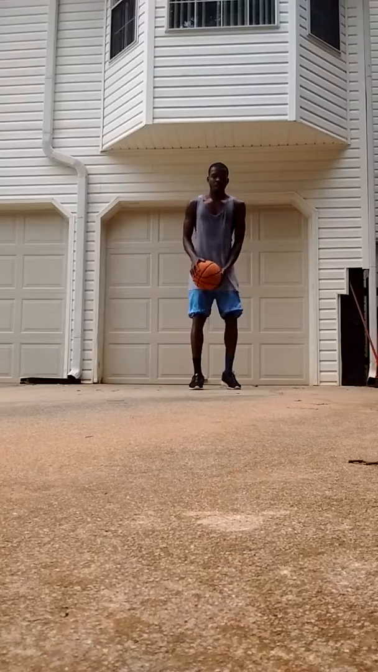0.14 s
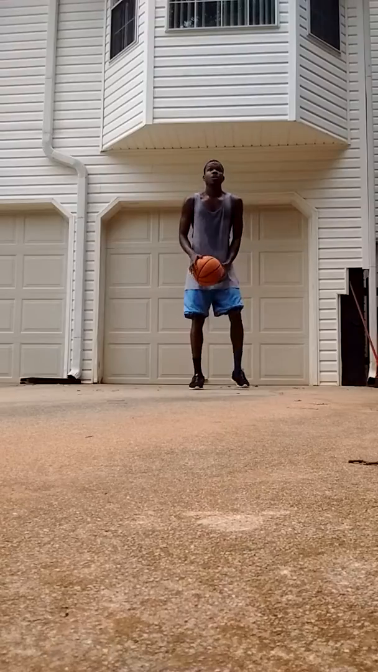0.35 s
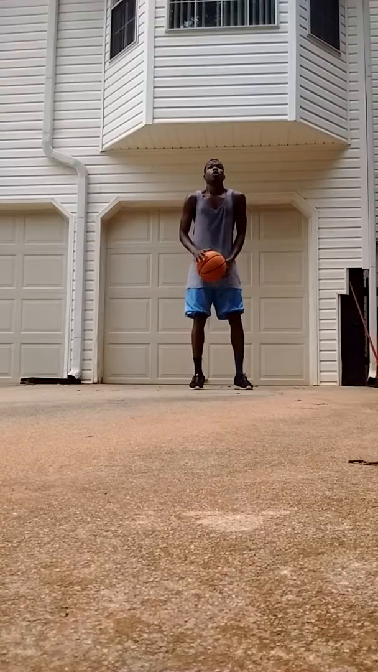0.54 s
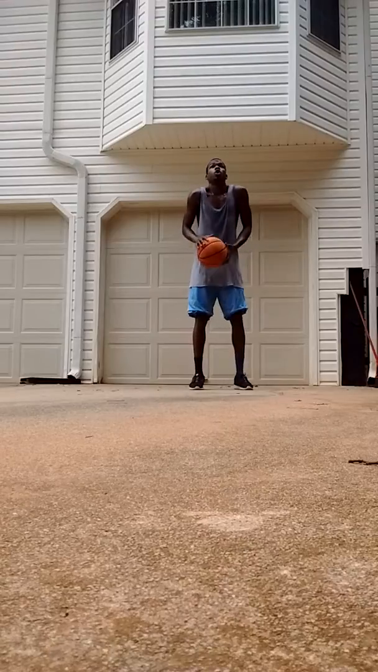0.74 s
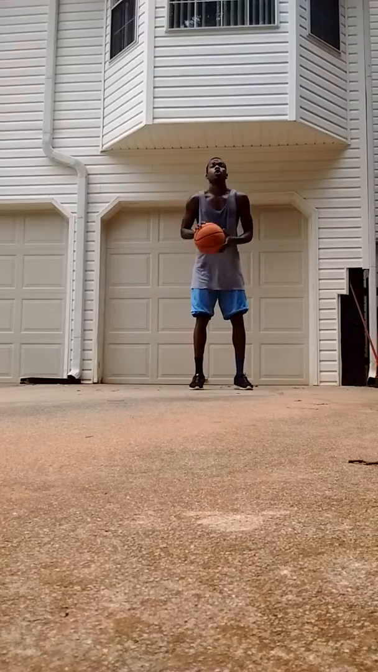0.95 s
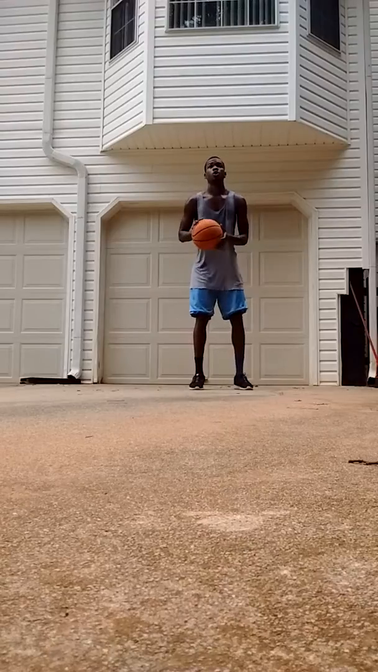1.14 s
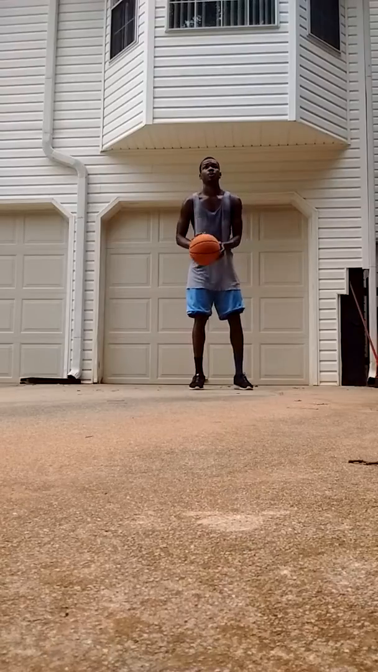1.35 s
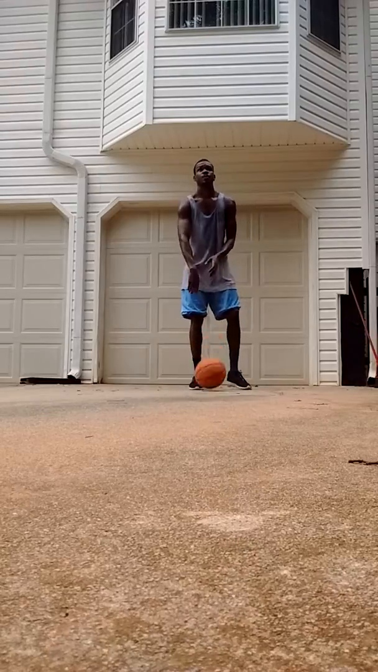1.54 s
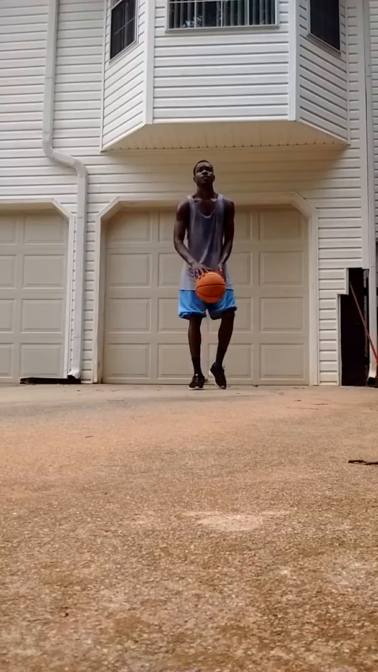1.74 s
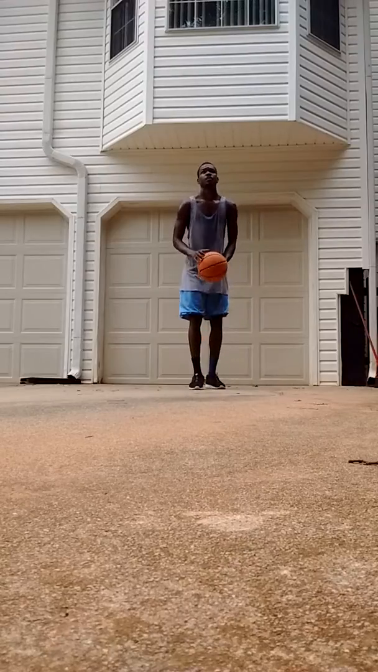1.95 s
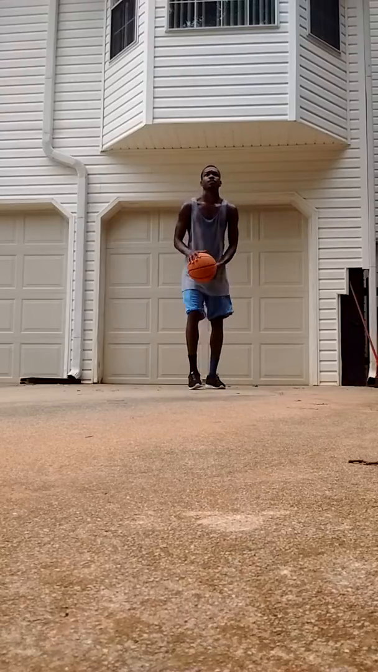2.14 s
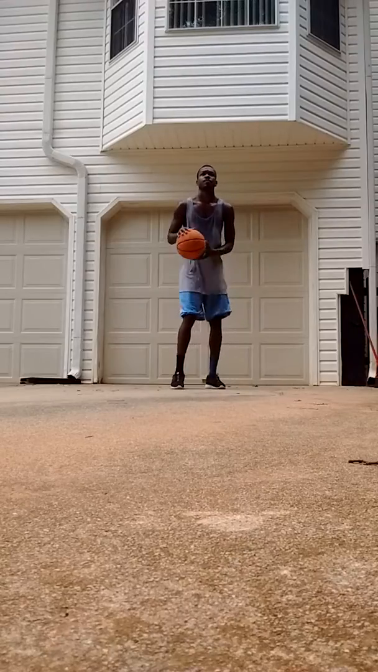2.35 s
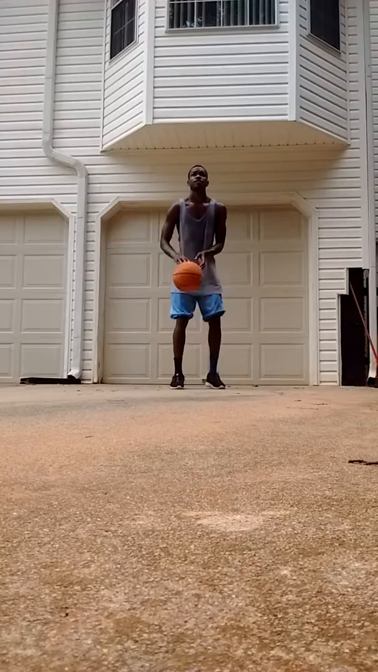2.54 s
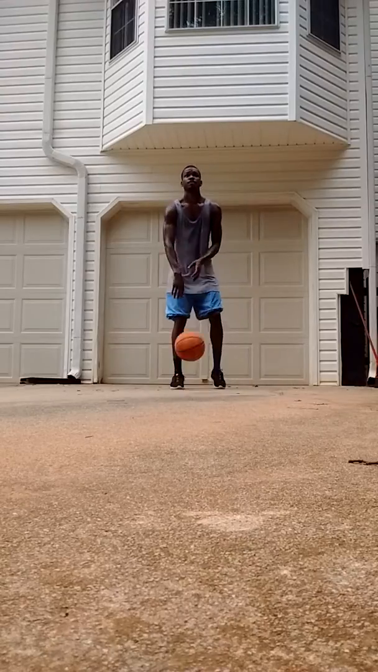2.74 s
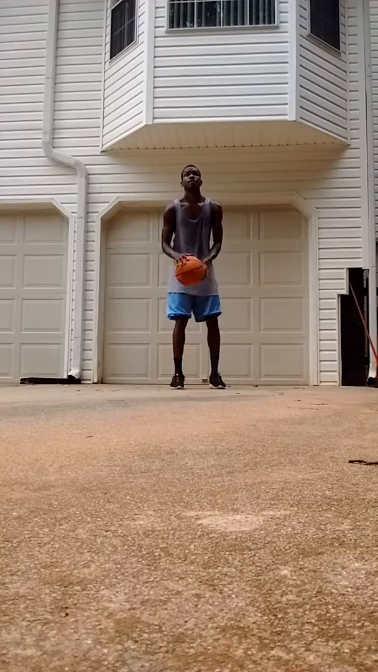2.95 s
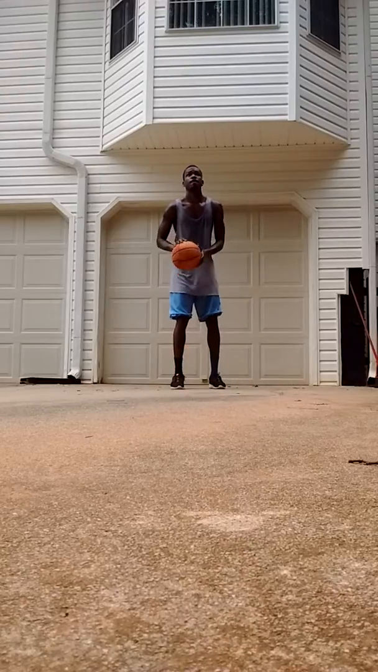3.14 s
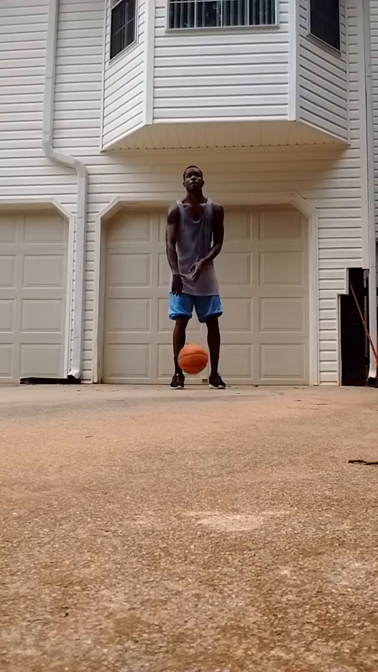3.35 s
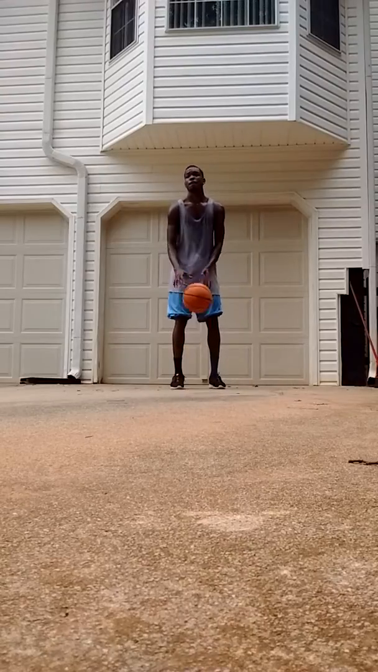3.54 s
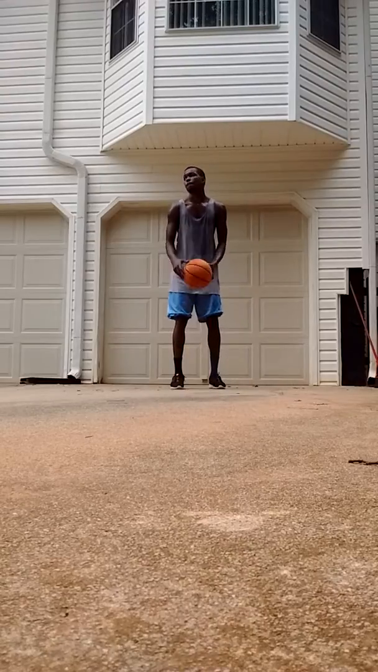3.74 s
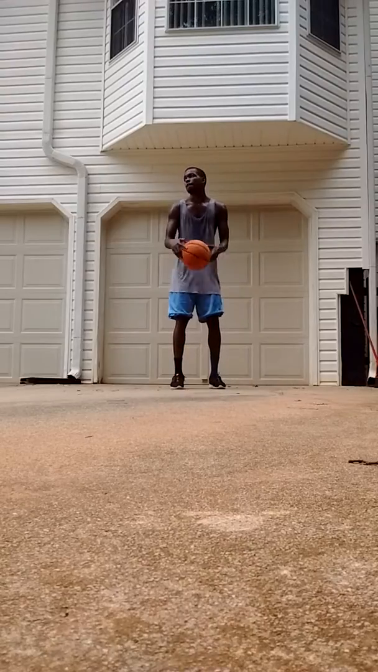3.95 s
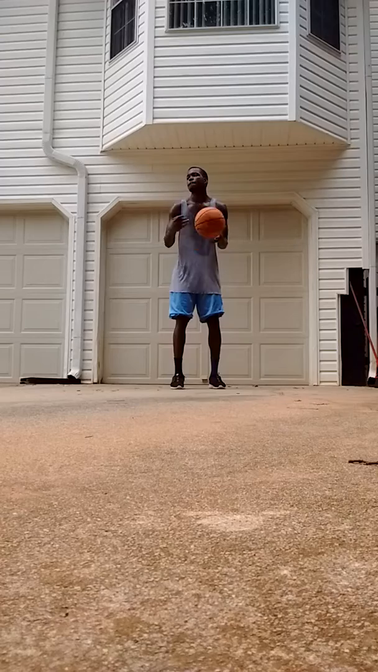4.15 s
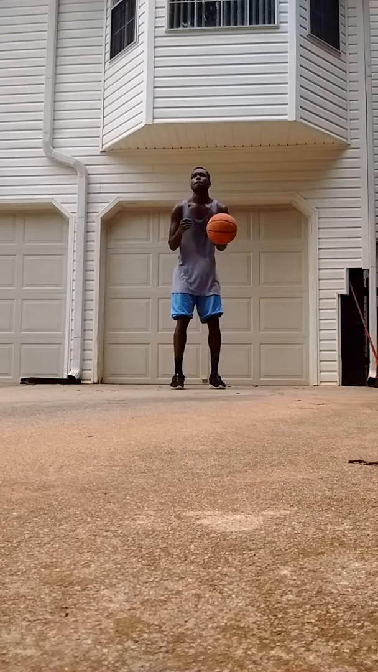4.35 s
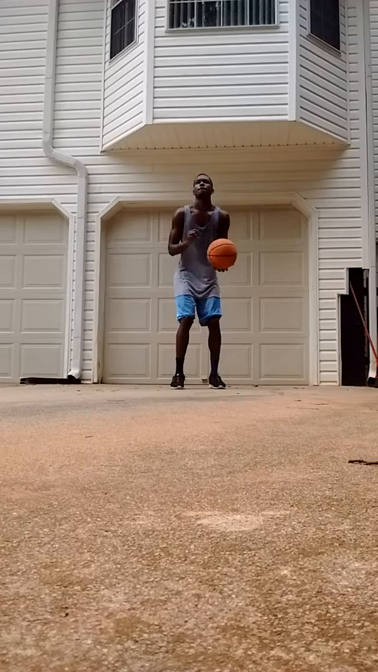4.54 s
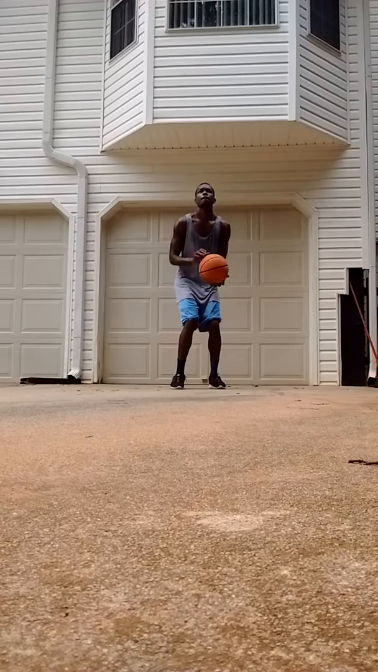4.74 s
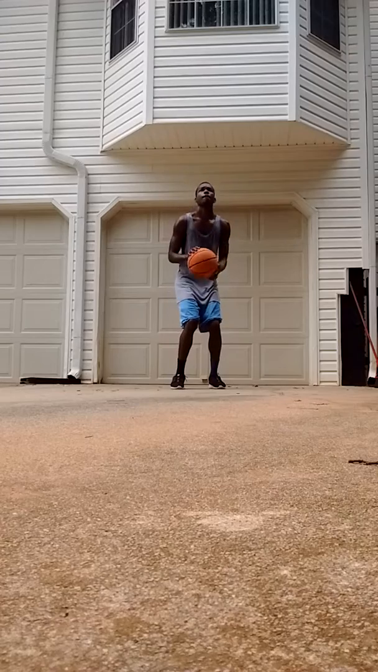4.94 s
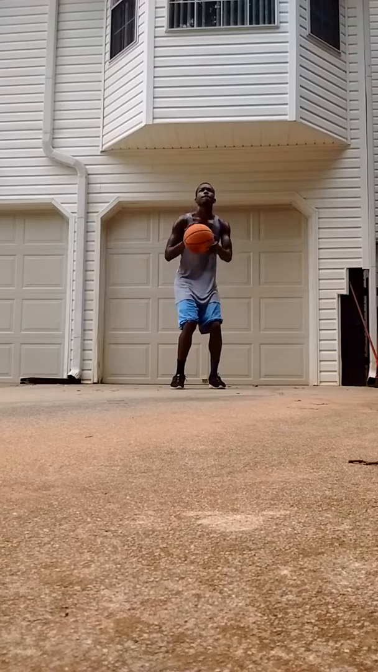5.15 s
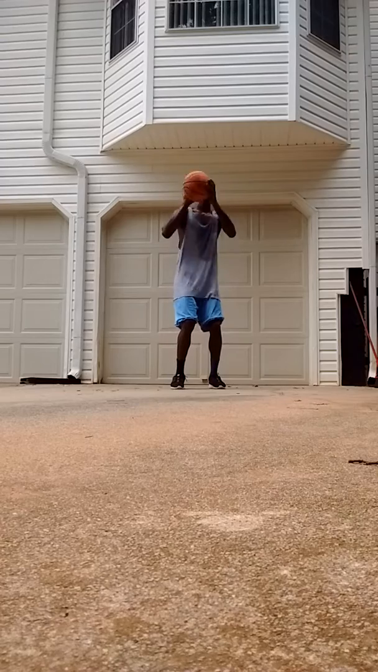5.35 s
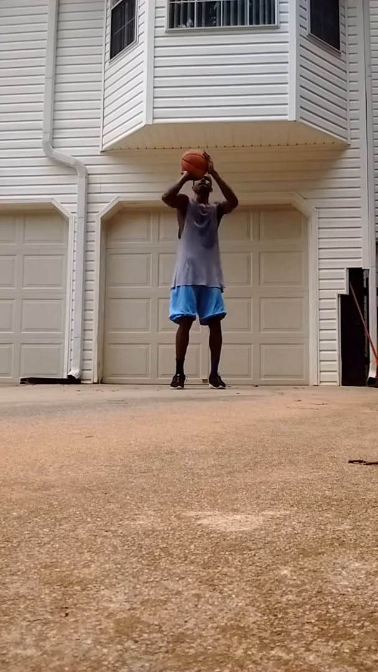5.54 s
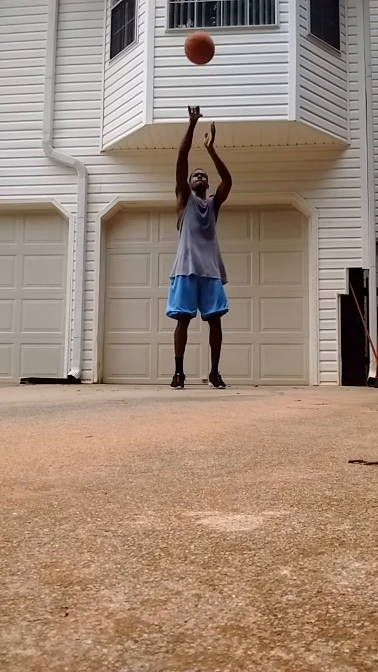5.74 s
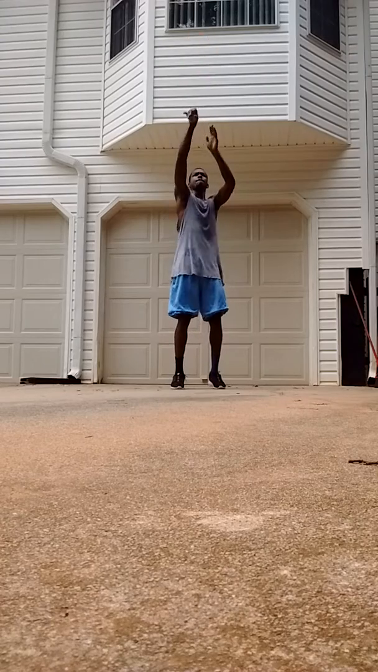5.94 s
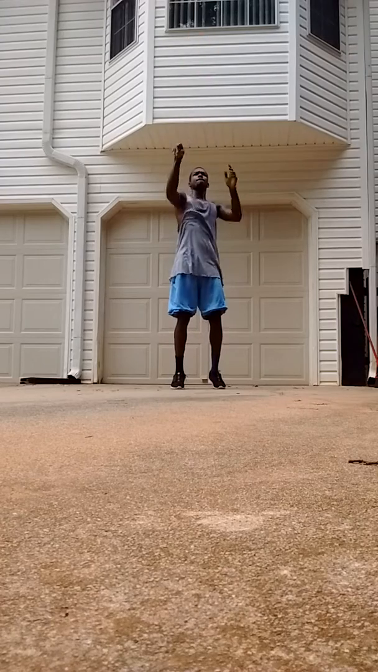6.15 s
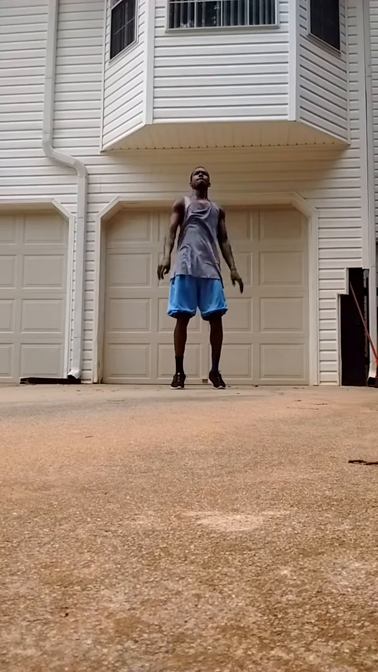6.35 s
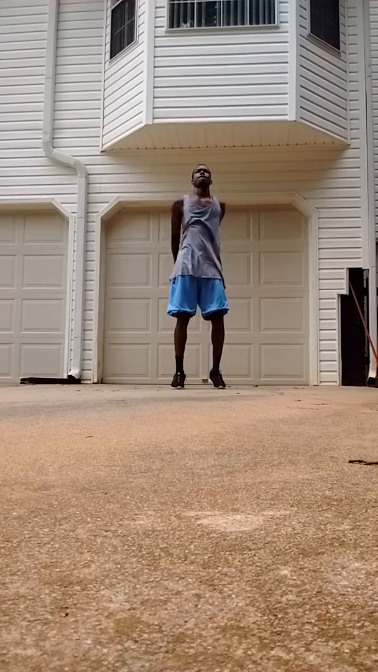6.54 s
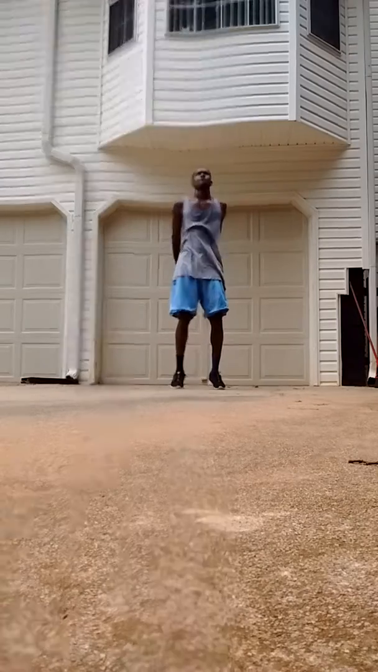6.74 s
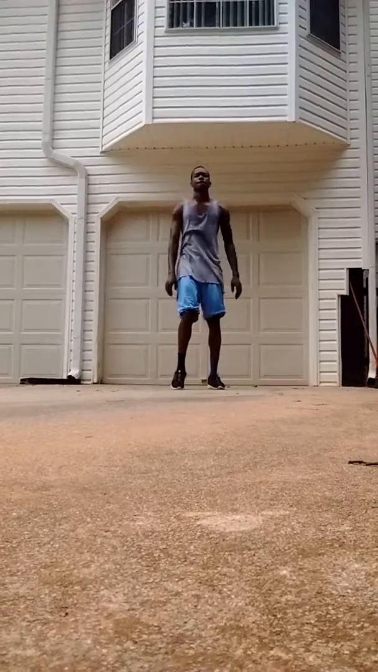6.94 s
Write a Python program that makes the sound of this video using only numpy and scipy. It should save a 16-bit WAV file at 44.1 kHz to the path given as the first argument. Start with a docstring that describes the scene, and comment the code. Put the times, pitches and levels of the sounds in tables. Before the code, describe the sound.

A phone near the hoop picks up windy leaves, far traffic, a passing engine's drone and a faint hum and whine. Three sharp, loud basketball smacks on concrete follow, slightly softer and duller each time, slapping back off the house. The phone ducks its level at each blow, then the yard noise creeps up. At the very end comes a brief, close clatter of rim and backboard with a bright metallic tick.

```python
"""Basketball by the garage

A ball bounces three times on a concrete driveway, then strikes the hoop beside a phone. Bounces are air pushes,
rubber noise and damped sines with wall echoes; the hoop is rattling clusters of damped sines and noise.
Shaped noise makes far traffic, leaves, a passing engine and a rumble; wavering sines make a hum and a whine.
The phone widens its two ports, and its gain ducks at each blow and creeps back, so the yard swells in the pauses."""
import sys
import numpy as np
from scipy import signal
from scipy.fft import rfft, irfft, next_fast_len
from scipy.io import wavfile
from scipy.ndimage import minimum_filter1d, map_coordinates

SR = 44100
rng = np.random.default_rng(int(sys.argv[2]) if len(sys.argv) > 2 else 0)


def store_wav(level_fs):
    """Save 16-bit WAV to argv[1]."""
    pcm = np.round(np.clip(np.atleast_2d(level_fs), -1, 1) * 32767)
    wavfile.write(sys.argv[1], SR, pcm.T.astype(np.int16))


N = 308259

# Stereo layers have two rows: the sum of the ports, then their difference. Levels are those ahead of the phone.
# Yard noise density in the sum, before its swells: [f/Hz, level/dB per Hz]
YARD_SUM = [(30, -92), (120, -59), (400, -75), (700, -75), (1500, -78), (2500, -78.5), (4600, -83),
            (6300, -91), (8000, -79), (10000, -88.5), (13000, -92.5), (13500, -115), (14800, -101),
            (15600, -120)]
# Yard noise density in the difference, before its swells: [f/Hz, level/dB per Hz]
YARD_DIFFERENCE = [(25, -68), (70, -80), (130, -48), (250, -55), (550, -61.5), (1000, -68), (1700, -75.5),
                   (3000, -82), (6500, -88.5), (9000, -82), (11500, -95), (12200, -105), (13500, -119.5),
                   (15500, -120)]
# Colour of the rustling leaves: [f/Hz, relative level/dB]
RUSTLE_COLOUR = [(2000, -6), (3500, 12), (4500, 5), (5600, 8), (8000, 0.5), (14000, -52)]
# Colour of the deep rumble: [f/Hz, relative level/dB]
RUMBLE_COLOUR = [(20, -4), (35, -6), (60, 6), (100, -14), (200, -36)]
# Colour of the far engine: [f/Hz, relative level/dB]
ENGINE_COLOUR = [(30, -7.5), (60, -4.5), (85, 9), (120, -9), (200, -39.5)]
# Spells of the whine: [start t/s, length t/s, level/dB]
WHINE_SPELLS = [(-.1, 0.61, -34.5), (0.875, 0.85, -30), (2.326, 0.38, -32)]
# Bounces: [t/s, blow level/dB, slap level/dB re blow, slap treble limit f/Hz, door level/dB re blow]
BOUNCES = [(1.6243, 18, -10.5, 10100, -35.5), (2.7554, 17, -11.5, 9000, -36),
           (3.4364, 15.5, -12.5, 7000, -35)]
# Modes of ball skin and air, re blow: [f/Hz, sum level/dB, difference level/dB, t60/s]
BALL_MODES = [(870, -58, -20.5, 0.018), (1034, -39, -34, 0.055), (1166, -35.5, -38, 0.053),
              (1480, -46, -25, 0.0096), (1864, -21, -43, 0.013), (2930, -58, -22, 0.008),
              (3980, -31.5, -41, 0.013)]
# Low thud as the flattened ball springs back, re blow: [f/Hz, sum level/dB, difference level/dB, t60/s]
THUD_MODES = [(93, -47, -8.5, 0.071), (141, -57, -16, 0.052), (208, -27.5, -21, 0.055)]
# Hollow ring of the garage door: [f/Hz, relative level/dB, t60/s]
DOOR_MODES = [(960, -7, 0.04), (1071, -0.5, 0.042), (1215, 0, 0.04), (1330, -3, 0.04), (1520, -6, 0.043),
              (1800, -9, .04), (1950, -9, 0.03)]
# Echoes off the house: [delay t/s, level/dB re direct sound, bass limit f/Hz, treble limit f/Hz]
WALL_ECHOES = [(0.0117, -9, 890, 4560), (0.0203, -11, 60, 800), (.029, -33, 60, 700)]
# Contacts of ball and hoop: [t/s, board level/dB, rim level/dB, rim brightness/dB per octave]
HOOP_CONTACTS = [(6.7868, -24, -6.5, 2), (6.788, -20, -3, 9), (6.7941, -0.5, -0.5, 8), (6.7985, 0, -4, 2),
                 (6.8012, -4, 2, -3), (6.809, -7, -2, 5), (6.814, -13, -8, 0), (6.818, -15, -6.5, -2),
                 (6.838, 0, -12, 0), (6.843, -14, -8, 3), (6.849, -5, -5, 1), (6.8538, 1.5, 5.5, -7),
                 (6.860, 1, -2, -4), (6.866, -0.5, 3.5, 6), (6.872, 1, -3, 4), (6.878, -4, -4, -3),
                 (6.883, -1, -10, -2), (6.889, -14, -9, 0), (6.897, -9, -16, -3), (6.919, -8, -16, -10)]
# Modes of the board: [f/Hz, relative level/dB, t60/s]
BOARD_MODES = [(128, 0, 0.058), (200, -6, 0.063), (330, -10, 0.054), (436, -7, 0.065), (602, -6, 0.06),
               (800, -5, 0.02)]
# Modes of the rim: [f/Hz, relative level/dB, t60/s]
RIM_MODES = [(800, -4, 0.01), (953, -2, 0.023), (1093, -4.5, 0.023), (1200, -3, 0.021), (1336, -10, 0.025),
             (1420, -8, 0.043), (1647, -11.5, 0.044), (1900, -18, 0.0097), (2240, -24, 0.01),
             (2700, -23, 0.0084), (3100, -33, 0.0066)]
# Ticks of a loose metal part: [t/s, level/dB]
TICKS = [(6.7868, -13), (6.7936, -13), (6.8228, 12), (6.854, -16), (6.862, -10), (6.867, -22)]
# Ring of that metal part: [f/Hz, relative level/dB, t60/s]
TICK_MODES = [(4700, -7.5, 0.0057), (8620, -2, 0.0045), (11960, -12.5, 0.0061)]
# Reverberation of house and driveway: [f/Hz, t60/s]
REVERB_T60 = [(100, 0.22), (1200, 0.29), (2500, 0.29), (4500, 0.36), (12000, 0.055)]
# Balance of the two ports: [f/Hz, second over first level/dB]
PORT_BALANCE = [(800, -0.5), (2000, 1), (3200, -11.5), (5000, -1), (6300, -2.5), (8000, 8), (12000, 5)]
# Balance of the widened stereo: [f/Hz, left over right level/dB]
STEREO_BALANCE = [(60, 1.5), (700, 0.67), (1300, 0), (2400, 2.5), (4400, 1), (8000, -1.5), (11000, 1.5),
                  (15000, 7)]

RUMBLE_DB, RUMBLE_GROWS_DB_S = -61, 3.0
PASS_S, PASS_DB, PASS_SPREAD_S = 1.45, -29.5, 1.18  # engine: nearest moment, level, distance over speed
TRAFFIC_DB, SWELL_S, SWELL_WIDTH_S, SWELL_DB = -1.28, 5.18, 0.31, 3  # traffic swells once
GUST_S, GUST_DB, GUST_RISE_DB_S, GUST_FALL_DB_S = 0.65, 5.5, 4, 1.3  # leaves peak, then calm steadily
RUSTLE_S, RUSTLE_DB, RUSTLE_ATTACK_S, RUSTLE_T60_S = 0.71, -39.5, 0.015, 1.4  # one sudden rustle
RUSTLE_BED_DB = -47  # faint bed under it, at the height of the gust
HUM_HZ, HUM_DB, HUM_GROWS_DB_S = 119.5, -39.5, 1.89
WHINE_HZ, WHINE_EDGE_S = 366.5, 0.085
RIM_MID_HZ = 1250  # pivot of the rim brightness
CRACK_DB = -14  # noise of a tick, beside its ring
SPRING_S, PUSH_S = 0.0016, 0.00099  # contact to spring-back, length of the push
SNAP = 1.4  # edge of the slap over its noise
SMEAR_S = 0.0015  # ribbed siding spreads each echo
DOOR_S, SHIVER_DB, SHIVER_T60_S = 0.0125, 10, 0.097  # door delay; panel shiver over the door level
REVERB_TREBLE_HZ, TOP_HZ = 4420, 16300  # treble limits of the reverberation and of the phone


def amp(db):
    """dB to gain."""
    return 10 ** (np.asarray(db) / 20)


def unit(x):
    """x at rms 1."""
    return x / np.sqrt(np.mean(x ** 2) + 1e-20)


def along(points, hz):
    """Reads a curve of (Hz, value) points on a log frequency axis."""
    f, v = np.transpose(points)
    return np.interp(np.log(hz + 1), np.log(f + 1), v)


def noise(length):
    """Independent white noise for sum and difference."""
    return rng.standard_normal((2, length))


def wobble(rate):
    """A smooth random curve, rate knots a second."""
    knots = rng.standard_normal(int(N * rate / SR) + 4)
    return map_coordinates(knots, [np.arange(N) * rate / SR])


def filtered(x, response):
    """x times a complex response of frequency."""
    m = next_fast_len(N + 8192)
    return irfft(rfft(x, m) * response(np.fft.rfftfreq(m, 1 / SR)), m)[..., :N]


def coloured(x, curve):
    """x shaped by a dB curve, at rms 1."""
    return unit(filtered(x, lambda hz: amp(along(curve, hz))))


def dull(x, hz):
    """x without its treble."""
    return signal.lfilter(*signal.butter(2, min(hz / (SR / 2), .99)), x)


def thin(x, hz):
    """x without its bass."""
    return signal.lfilter(*signal.butter(2, min(hz / (SR / 2), .99), "high"), x)


def ring(modes, t, scatter_db):
    """Damped sines, each struck at a slightly random strength."""
    total = 0
    for hz, db, t60 in modes:
        level_db = db + scatter_db * rng.standard_normal()
        total = total + amp(level_db - 60 * t / t60) * np.sin(2 * np.pi * hz * t)
    return total


def stereo_ring(modes, t, scatter_db):
    """Damped sines with separate strengths in sum and difference."""
    return np.array([ring([(hz, row[k], t60) for hz, *row, t60 in modes], t, scatter_db) for k in range(2)])


def add(track, s, sound):
    """Mixes sound into track from time s."""
    place = track[:, round(s * SR):][:, :sound.shape[1]]
    place += sound[:, :place.shape[1]]


def echoed(x, wet_db):
    """x with the diffuse answer of house and driveway, each frequency dying at its own speed."""
    hz, t, z = signal.stft(noise(SR // 3), SR, nperseg=256)
    decay = amp(-60 * t / along(REVERB_T60, hz)[:, None])
    tail = signal.istft(z * decay, SR, nperseg=256)[1]
    late_tail = np.pad(tail, ((0, 0), (round(.008 * SR), 0)))
    late_tail = late_tail / np.linalg.norm(tail, axis=1)[:, None]
    wet = signal.fftconvolve(dull(x, REVERB_TREBLE_HZ), late_tail, axes=1)
    return np.pad(x, ((0, 0), (0, wet.shape[1] - x.shape[1]))) + amp(wet_db) * wet


def rumble():
    """Deep noise, made lumpy by a random level, that slowly grows."""
    t = np.arange(N) / SR
    air = coloured(rng.standard_normal(N), RUMBLE_COLOUR)
    return amp(RUMBLE_DB + RUMBLE_GROWS_DB_S * t + 4.1 * wobble(3.6)) * air * [[.15], [1]]


def engine():
    """A low noise-band drone passing far off, its level falling as one over distance."""
    t = np.arange(N) / SR
    drone = coloured(rng.standard_normal(N), ENGINE_COLOUR)
    distance = np.hypot(1, (t - PASS_S) / PASS_SPREAD_S)
    return amp(PASS_DB) / distance * drone * [[0], [1]]


def gust_db(t):
    """Level of the leaves: a steady climb to the gust, then a slower fall."""
    return GUST_DB - np.maximum(GUST_RISE_DB_S * (GUST_S - t), GUST_FALL_DB_S * (t - GUST_S))


def traffic_and_leaves():
    """One yard noise split near 700 Hz: traffic moves the bass, leaves move the treble."""
    t = np.arange(N) / SR
    white = noise(N) * np.sqrt(SR / 2)  # 0 dB per Hz
    colour = lambda hz: amp([along(YARD_SUM, hz), along(YARD_DIFFERENCE, hz)])
    low = lambda hz: 1 / (1 + (hz / 700) ** 2)
    traffic_db = TRAFFIC_DB + SWELL_DB * np.exp(-((t - SWELL_S) / SWELL_WIDTH_S) ** 2)
    traffic = filtered(white, lambda hz: colour(hz) * low(hz))
    leaves = filtered(white, lambda hz: colour(hz) * (1 - low(hz)))
    return amp(traffic_db + 1.75 * wobble(5.5)) * traffic + amp(gust_db(t) + 0.97 * wobble(6.1)) * leaves


def rustle():
    """Bright leaf noise: one sudden dying burst over a faint bed that follows the gust."""
    t = np.arange(N) / SR
    since = np.maximum(t - RUSTLE_S, 0)
    burst = amp(RUSTLE_DB - 60 * since / RUSTLE_T60_S) * (1 - np.exp(-since / RUSTLE_ATTACK_S))
    bed = amp(RUSTLE_BED_DB + gust_db(t) - GUST_DB)
    return (burst + bed) * coloured(noise(N), RUSTLE_COLOUR)


def hum():
    """A growing low sine that wavers in level and phase, in the difference only."""
    t = np.arange(N) / SR
    level_db = HUM_DB + HUM_GROWS_DB_S * t + 3.6 * wobble(11.0) + 0.72 * wobble(1.48)
    return amp(level_db) * np.sin(2 * np.pi * HUM_HZ * t + 1.66 * wobble(13)) * [[0], [1]]


def whine():
    """A faint wavering sine that fades in and out in spells, in the difference only."""
    t = np.arange(N) / SR
    spells = 0
    for s, length, db in WHINE_SPELLS:
        spells = spells + amp(db) * np.clip(np.minimum(t - s, s + length - t) / WHINE_EDGE_S, 0, 1)
    tone = np.sin(2 * np.pi * WHINE_HZ * t + 1.3 * wobble(14))
    return spells * amp(3.8 * wobble(7.48)) * tone * [[0], [1]]


def metal_ticks():
    """A loose metal part ticks: short high modes and a crack of noise."""
    track, t = np.zeros((2, N)), np.arange(SR // 6) / SR
    for s, db in TICKS:
        crack = amp(CRACK_DB - 60 * t / 0.0036) * dull(noise(len(t)), hz=12600)
        crack = thin(crack, hz=3330) * amp([[0], [-5]])
        click = ring(TICK_MODES, t, scatter_db=1) * amp([[-5], [-15]])
        add(track, s, amp(db) * (click + crack))
    return track


def hoop():
    """Board and rim answer each contact with ringing modes and a short noisy rattle."""
    track, t = np.zeros((2, N)), np.arange(SR // 6) / SR
    for s, board_db, rim_db, bright_db in HOOP_CONTACTS:
        board = amp(board_db) * ring(BOARD_MODES, t, scatter_db=5.5) * amp([[-30], [0]])
        board = board * (1 - np.exp(-t / 0.0016))
        tilted = [(hz, db + bright_db * np.log2(hz / RIM_MID_HZ), t60) for hz, db, t60 in RIM_MODES]
        rim = amp(rim_db) * ring(tilted, t, scatter_db=4.5) * amp([[-9], [-16]])
        rattle = amp(rim_db - 1 - 60 * t / 0.012) * dull(noise(len(t)), hz=1880)
        rattle = thin(rattle, hz=640) * amp([[0], [-4]])
        fizz = amp(rim_db - 21.5 - 60 * t / 0.048) * thin(dull(noise(len(t)), hz=9000), hz=2400)
        swell = 1 - np.exp(-t / 0.00083)  # the soft ball loads the metal gradually
        add(track, s, echoed(board + swell * (rim + rattle + fizz), wet_db=-15))
    return track


def smeared(x):
    """x spread over a short dying burst of scattered copies."""
    t = np.arange(SR // 100) / SR
    spikes = np.abs(rng.standard_normal(len(t))) ** 3 * rng.choice([-1, 1], len(t))
    burst = spikes * np.exp(-t / SMEAR_S)
    return signal.fftconvolve(x, burst[None] / np.linalg.norm(burst), axes=1)[:, :x.shape[1]]


def with_garage(direct, door_db):
    """The bounce plus its smeared wall echoes, the hollow door ring and the shiver of loose panels."""
    near, t = direct.copy(), np.arange(direct.shape[1]) / SR
    for delay, db, low_hz, high_hz in WALL_ECHOES:
        add(near, delay, amp(db) * smeared(thin(dull(direct, high_hz), low_hz)))
    door = amp(door_db) * ring(DOOR_MODES, t, scatter_db=3.5) * (1 - np.exp(-t / 0.0011))
    add(near, DOOR_S, door * amp([[0], [-12]]))
    shiver = thin(dull(noise(len(t)), hz=1900), hz=900)
    shiver_level = amp(door_db + SHIVER_DB - 60 * t / SHIVER_T60_S) * (1 - np.exp(-t / .002))
    add(near, DOOR_S, shiver_level * shiver)
    return near


def bounce(slap_db, slap_hz):
    """Ball on concrete: a push of air, a rubber slap and scuff, the ringing ball and the spring-back thud."""
    t = np.arange(SR // 8) / SR
    push = 0.86 * (1 - np.exp(-t / .00008)) * np.exp(-(t / PUSH_S) ** 2) * amp([[-25], [0]])
    snap = SNAP * (t == 0) + noise(len(t))  # one sharp edge, then rubber noise
    slap = amp(slap_db - 60 * t / 0.0037) * dull(snap, slap_hz) * amp([[-5], [0]])
    slap = thin(slap, hz=1530)
    scuff = amp(-26 - 60 * t / 0.034) * dull(noise(len(t)), hz=2300) * amp([[-2], [0]])
    body = -stereo_ring(BALL_MODES, t, scatter_db=1)
    # the thud starts as a pull, once the ball lets go of the ground
    thud = -stereo_ring(THUD_MODES, np.maximum(t - SPRING_S, 0), scatter_db=.5)
    return thin(push + slap + scuff + body + thud, hz=51.4)


def ball():
    """Three bounces, each answered by the garage and the diffuse echo."""
    track = np.zeros((2, N))
    for s, blow_db, slap_db, slap_hz, door_db in BOUNCES:
        near = with_garage(bounce(slap_db, slap_hz), door_db)
        add(track, s, amp(blow_db) * echoed(near, wet_db=-11.5))
    return track


def scene():
    """Mixes all layers and turns sum and difference into the two microphone ports."""
    yard = rumble() + engine() + traffic_and_leaves() + rustle() + hum() + whine()
    both, apart = yard + metal_ticks() + hoop() + ball()
    return np.array([both + apart, both - apart])


def gain_control(x, target_db, start_db, hold, rise_db, attack):
    """Gain drops to bring peaks to the target, holds (s), then climbs rise_db a second up to full."""
    t = np.arange(N) / SR
    peak_db = 20 * np.log10(np.abs(x).max(axis=0) + 1e-6)
    peak_db[0] = target_db - start_db  # sets the opening gain to start_db
    size = round(abs(hold) * SR) // 2 * 2 + 1
    held_db = -minimum_filter1d(-peak_db, size, origin=size // 2, mode="nearest")
    memory_db = np.maximum.accumulate(held_db + rise_db * t) - rise_db * t
    wanted_db = np.minimum(target_db - memory_db, 0)
    lag = np.exp(-1 / (abs(attack) * SR))  # attack is the smoothing time in s
    gain_db = signal.lfilter([1 - lag], [1, -lag], wanted_db, zi=[lag * wanted_db[0]])[0]
    return amp(gain_db)


def record(dry):
    """The phone: unequal ports, widening, gain control, clipping and the band limit."""
    ports = filtered(dry, lambda hz: amp(along(PORT_BALANCE, hz) / 2 * [[-1], [1]]))
    # each side loses a delayed copy of the other port, which combs sum and difference in turn
    cross = lambda hz: .72 / (1 + (hz / 7600) ** 8) * np.exp(-2j * np.pi * hz * .000317)
    wide = ports - filtered(ports[::-1], cross)
    wide = filtered(wide, lambda hz: amp(along(STEREO_BALANCE, hz) / 2 * [[1], [-1]]))
    wide = wide * gain_control(wide, target_db=-1.0, start_db=-16.0, hold=0.31, rise_db=10.0, attack=0.0051)
    # a fast limiter catches what the slow stage lets through
    wide = wide * gain_control(wide, target_db=-1, start_db=0, hold=.0004, rise_db=5000, attack=.0005)
    clipped = wide / (1 + np.abs(wide) ** 12) ** (1 / 12)
    return filtered(clipped, lambda hz: hz < TOP_HZ)


dry = scene()
out = record(dry)
store_wav(out)
```